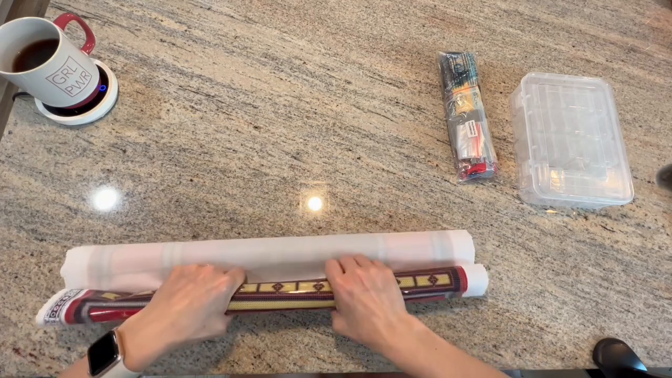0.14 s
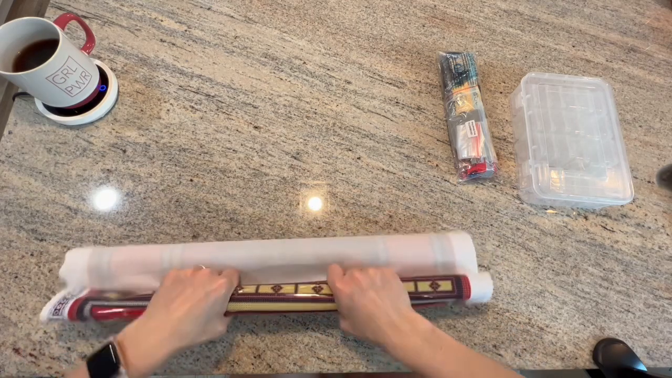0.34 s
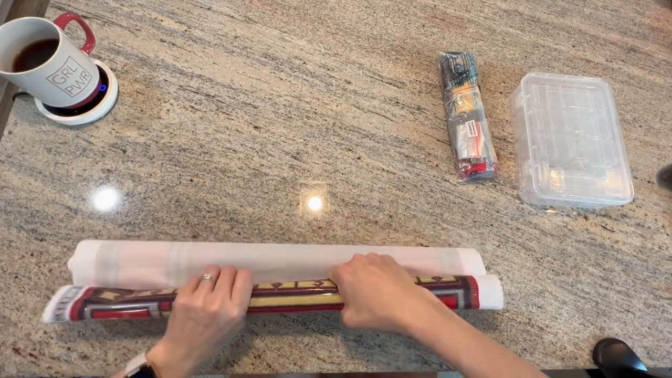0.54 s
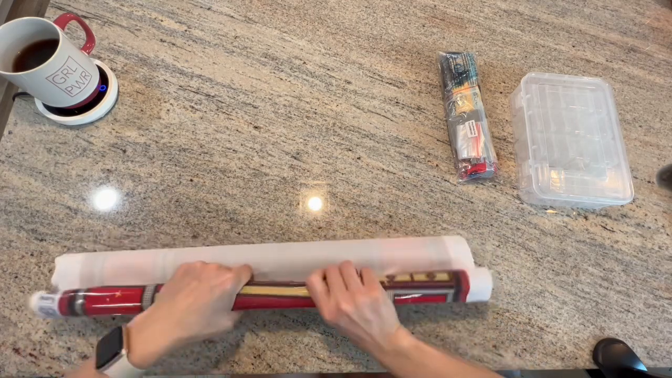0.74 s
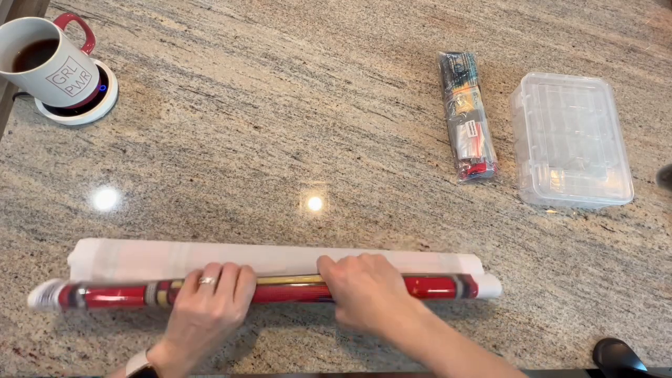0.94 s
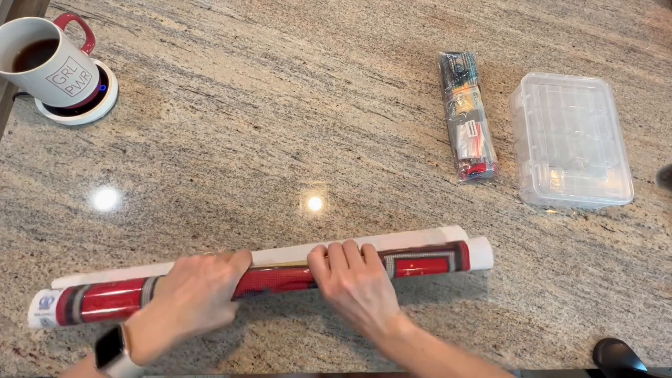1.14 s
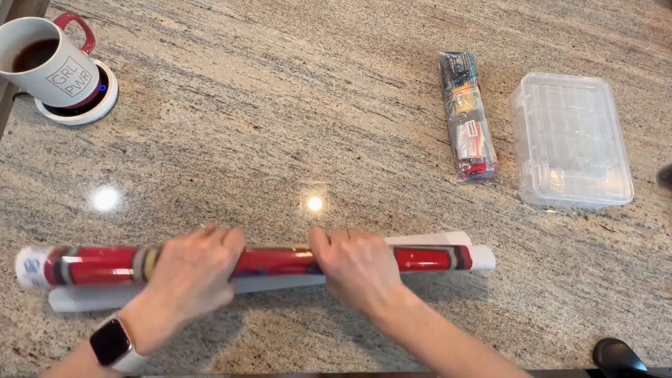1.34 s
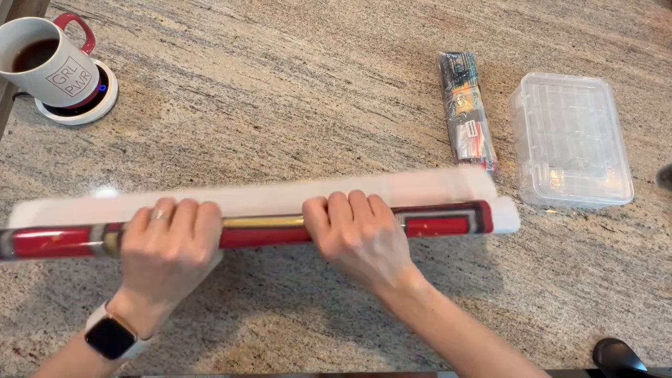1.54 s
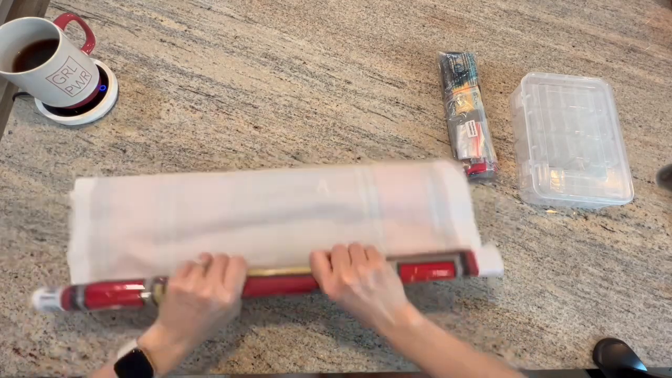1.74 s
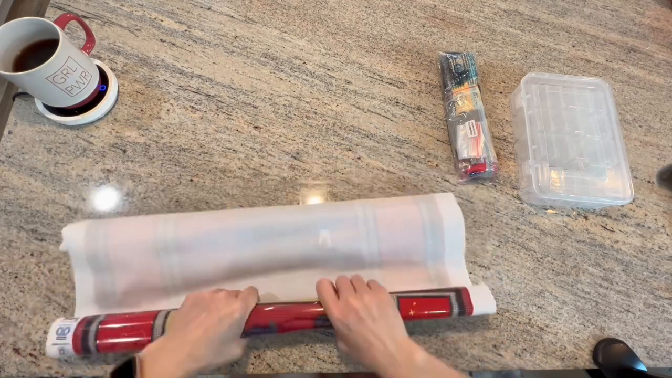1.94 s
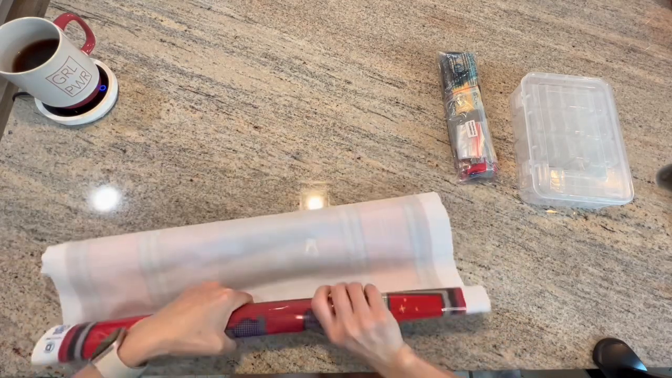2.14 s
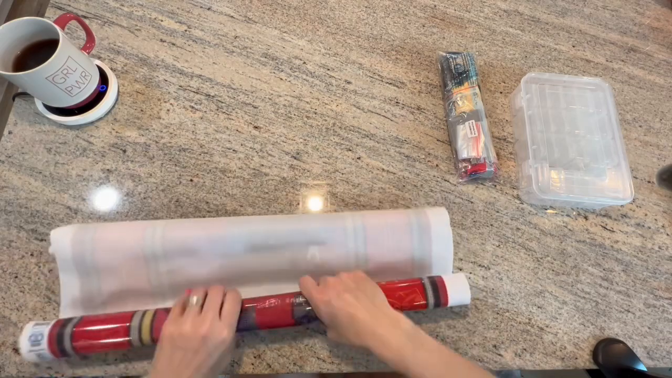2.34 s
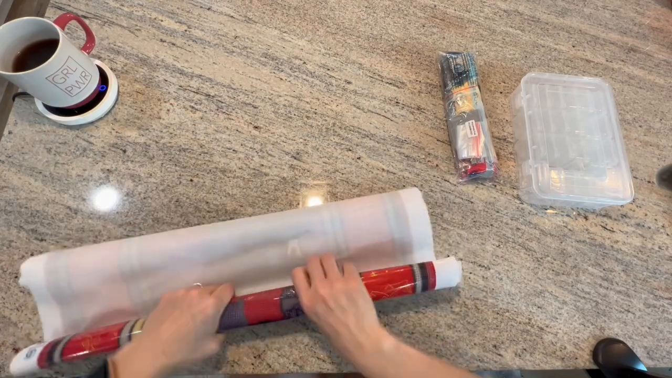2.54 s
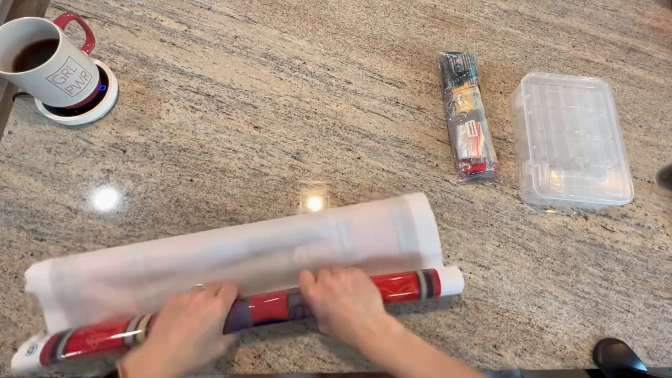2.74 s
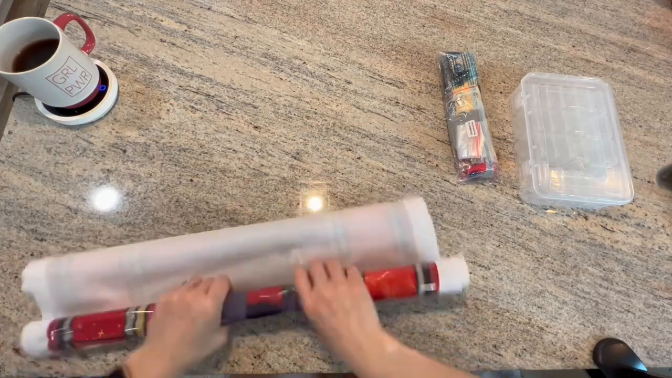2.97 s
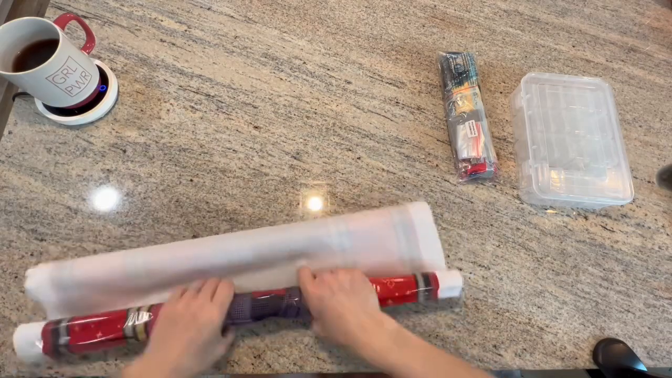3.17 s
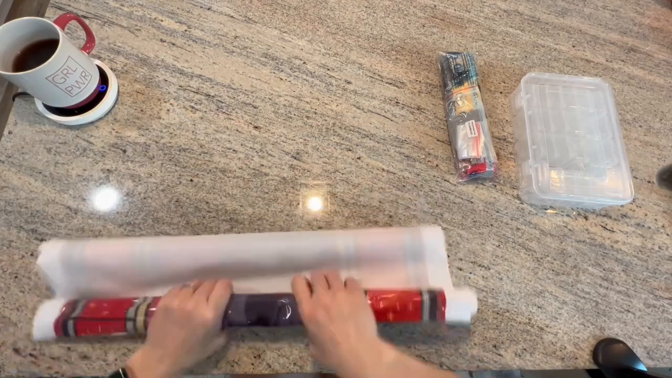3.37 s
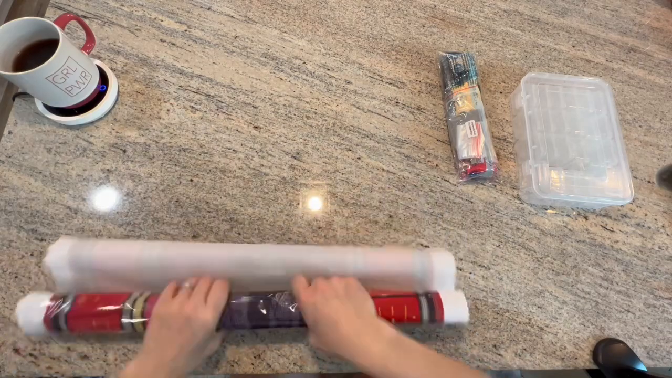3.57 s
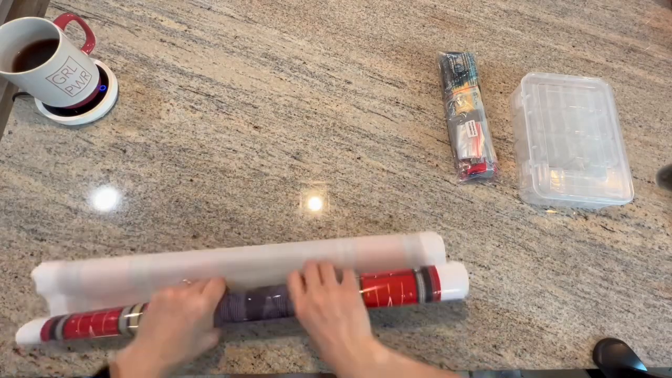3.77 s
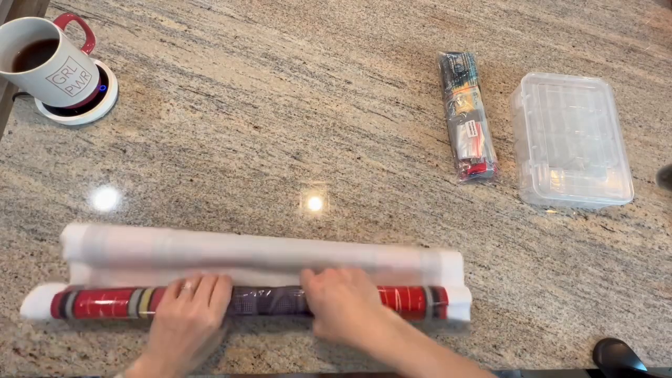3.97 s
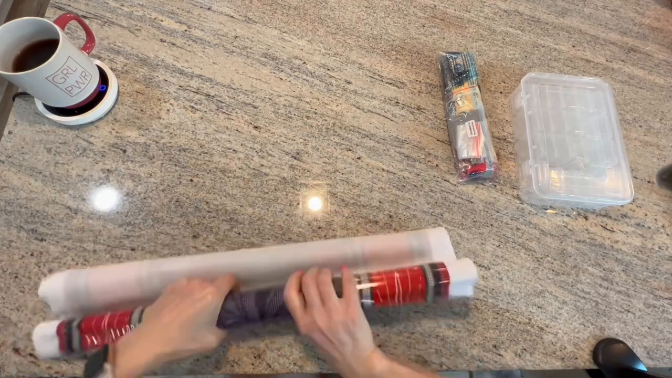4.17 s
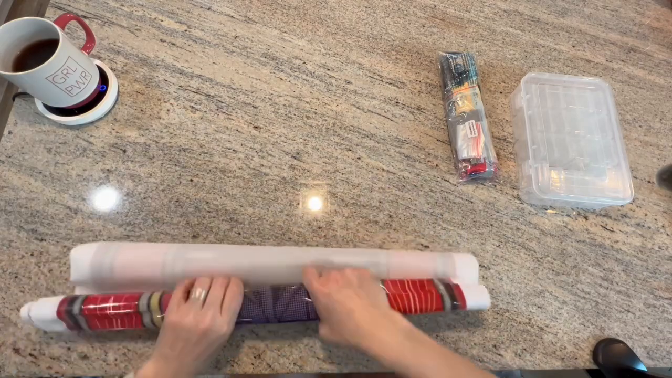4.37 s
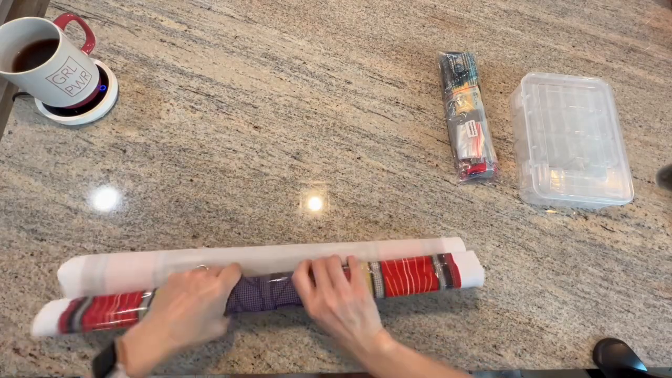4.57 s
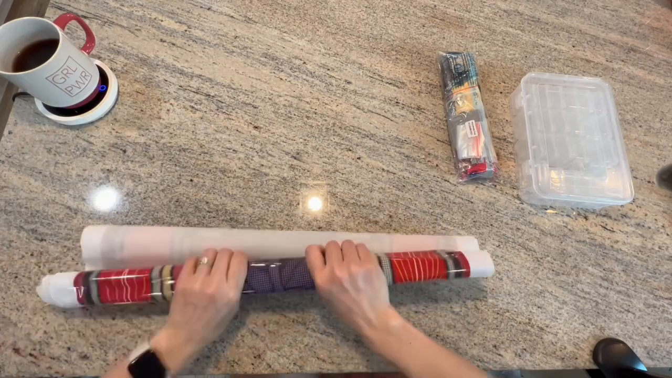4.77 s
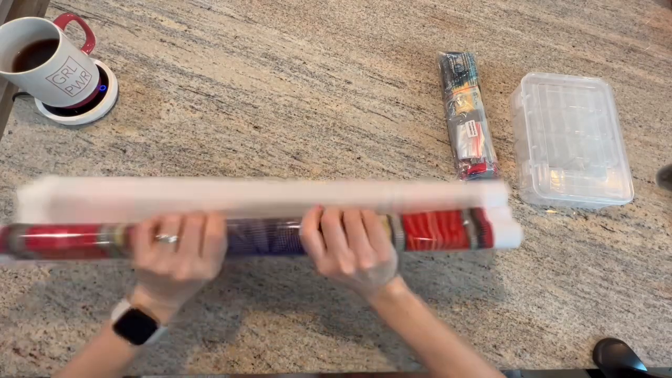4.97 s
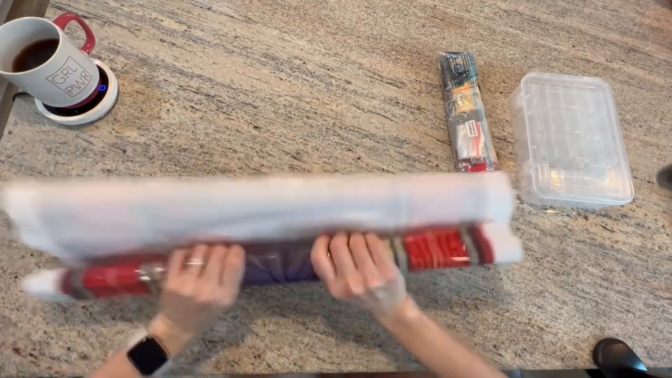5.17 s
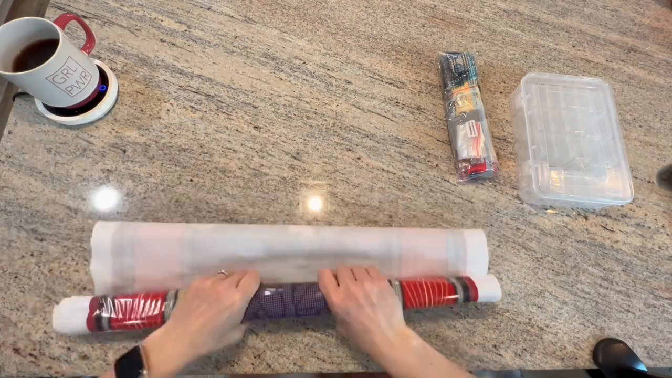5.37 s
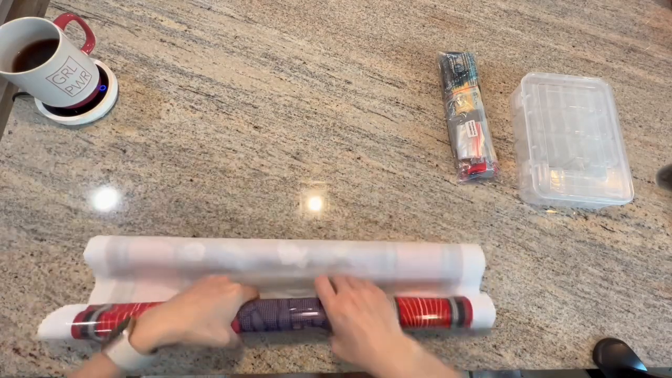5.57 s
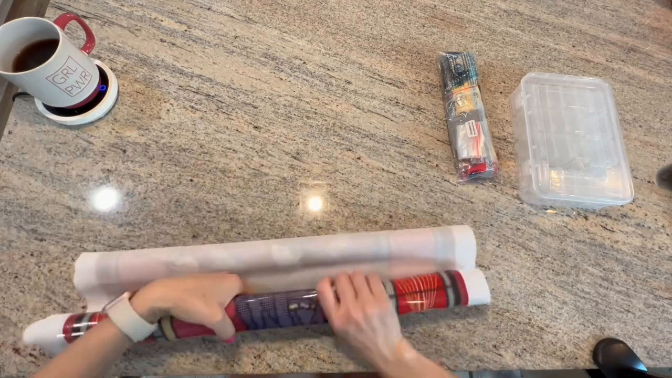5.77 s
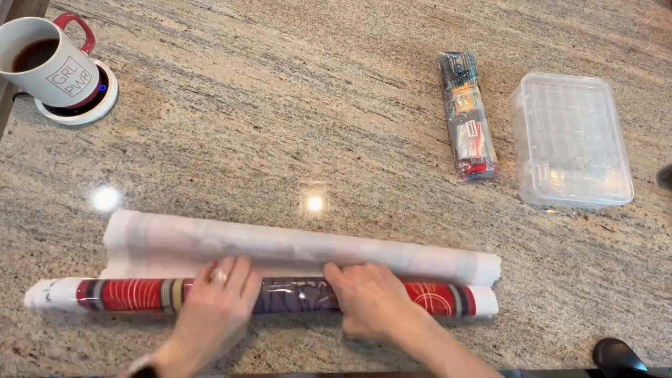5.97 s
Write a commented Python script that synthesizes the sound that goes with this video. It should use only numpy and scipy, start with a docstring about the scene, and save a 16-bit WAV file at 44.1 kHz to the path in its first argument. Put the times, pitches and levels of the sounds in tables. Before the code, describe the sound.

Close up in a quiet room, hands unroll a stiff coated canvas on a stone counter. Busy bright rustling and sharp creases come first, then a softer lull, a cracking slap with hollow pops, steady crinkling and knocking, and a second, heavier slap with a thump before the rustling resumes. Crisp treble leans left in the close stereo pickup.

```python
"""Hiss, dry crackle and small hollow pops: two hands unroll a stiff plastic-coated canvas on a stone counter.
Hand strokes drive noise bursts (coating) and ringing facets (flexing); filtered noise gives edge scrapes,
gliding pulses the buckling pops, low rumble and falling sines the roll bumping along.
Twice the roll slaps down: crack, thump, flap clatter. Sheet sounds also ring the air column in the roll.
A close microphone pair picks this up in a room with quiet air."""
import sys
import numpy as np
from scipy import signal
from scipy.fft import rfft, irfft
from scipy.io import wavfile
from scipy.ndimage import uniform_filter1d, map_coordinates

SR = 44100
rng = np.random.default_rng(int(sys.argv[2]) if len(sys.argv) > 2 else 0)


def store_wav(level_fs):
    """Save 16-bit WAV to argv[1]."""
    pcm = np.round(np.clip(np.atleast_2d(level_fs), -1, 1) * 32767)
    wavfile.write(sys.argv[1], SR, pcm.T.astype(np.int16))


N = 265041
TIME = np.arange(N) / SR
BINS = np.fft.rfftfreq(N, 1 / SR)

SLACKEN_DB_PER_S, RELEASE_S = 18, 0.05  # release: time constant


def stroke(t, swell_s, length_s):
    """Stroke envelope: swells, slackens while the hand moves, then the stiff sheet creeps to rest."""
    held_s = np.clip(t, 0, length_s)
    attack = np.clip(t / swell_s, 0, 1)
    release = np.exp(-np.maximum(t - length_s, 0) / RELEASE_S)
    return attack * gain_of(-SLACKEN_DB_PER_S * held_s) * release


# pushes and pulls of a hand: start t/s, swell/s, length/s, sliding level/dB, flexing level/dB,
# treble side/dB (higher = further left)
HAND_STROKES = [ (-0.02, .01, 0.015, -41, -40.5, 11), (0.069, 0.033, 0.035, -38.5, -34, 12),
                (0.171, 0.039, 0.072, -37.5, -36, 9), (0.24, 0.0083, 0.07, -39.5, -52, 10),
                (0.287, 0.063, 0.095, -39, -39.5, 11.5), (0.462, 0.0077, 0.11, -43, -49, 15),
                (0.52, 0.023, 0.11, -39, -39, 11.5), (0.643, 0.015, 0.021, -37, -47, 10),
                (0.716, 0.0068, 0.016, -38.5, -37.5, 10.5), (0.755, 0.033, 0.1, -39.5, -38.5, 12),
                (0.936, 0.087, 0.16, -37.5, -37.5, 11.5), (1.123, 0.018, 0.093, -40.5, -36.5, 11),
                (1.216, 0.024, 0.25, -50.5, -46.5, 14), (1.468, 0.043, 0.09, -54, -45, 12),
                (1.678, 0.018, 0.056, -42, -51, 10.5), (1.86, 0.042, 0.077, -44, -44, 10.5),
                (2.122, 0.014, 0.053, -43, -36, 7), (2.176, 0.0092, 0.061, -40, -39.5, 10.5),
                (2.307, 0.039, 0.12, -48, -42, 11.5), (2.408, 0.032, 0.1, -44.5, -38, 11),
                (2.551, 0.043, 0.1, -39.5, -36.5, 10), (2.694, 0.022, 0.08, -47, -42, 11),
                (2.798, .015, 0.18, -44.5, -40.5, 11.5), (2.988, 0.0084, 0.016, -41, -38, 13),
                (3.037, 0.02, 0.17, -44.5, -40, 10), (3.238, 0.066, 0.13, -42.5, -36.5, 11.5),
                (3.434, 0.028, 0.16, -44.5, -39.5, 10), (3.597, 0.036, 0.15, -43, -44.5, 12.5),
                (3.786, 0.014, 0.15, -43.5, -43.5, 11.5), (3.92, 0.023, 0.16, -46.5, -41, 8.5),
                (4.05, 0.041, 0.1, -42.5, -43.5, 10), (4.188, 0.095, 0.17, -43, -39, 10.5),
                (4.419, 0.037, 0.08, -46, -42, 11.5), (4.577, 0.014, 0.17, -50.5, -46.5, 11.5),
                (4.778, 0.054, 0.087, -44.5, -41, 13.5), (4.93, 0.018, 0.14, -49.5, -52, 10),
                (5.071, 0.0098, 0.24, -45, -45, 10.5), (5.361, 0.026, 0.075, -43, -40.5, 11.5),
                (5.53, 0.044, 0.035, -42.5, -41, 11), (5.631, 0.014, 0.081, -49.5, -47.5, 8.5),
                (5.761, .008, 0.088, -45.5, -43.5, 8), (5.85, 0.034, 0.084, -44.5, -40.5, 9.5), ]
# the held sheet, never quite still: sliding level/dB, flexing level/dB, treble side/dB
HELD_SHEET = (-57.5, -51.5, 11.5)


def handling():
    """Strokes add in power; returns sliding gain, flexing gain and power-weighted treble side in dB."""
    t = TIME[::32]
    shapes = [stroke(t - start, swell, length) for start, swell, length, *_ in HAND_STROKES]
    power = np.array(shapes + [np.ones(len(t))]) ** 2
    slide_db, flex_db, side_db = np.transpose([row[3:] for row in HAND_STROKES] + [HELD_SHEET])
    slide_power, flex_power = gain_of(slide_db) ** 2, gain_of(flex_db) ** 2
    slide = np.sqrt(slide_power @ power)
    flex = np.sqrt(flex_power @ power)
    side = (side_db * slide_power) @ power / (slide_power @ power)
    return [np.interp(TIME, t, control) for control in (slide, flex, side)]


# spectrum of coating hiss: f/Hz, level/dB
HISS_COLOUR = [(60, -44), (200, -12.5), (500, 0), (900, -5.5), (2500, 1), (3800, -0.5), (6000, 1),
               (8000, -1.5), (10000, -3), (12000, -6.5), (13500, -11.5), (16000, -10.5)]
# spectrum of crackles and crinkles: f/Hz, level/dB
CRACKLE_COLOUR = [(60, -44), (250, -14), (1000, -5.5), (3200, 7.5), (6500, 2), (9000, 2.5), (12000, 6),
                  (16000, -4.5)]


def sliding(slide, hand_db, level_db=3.0, crackle_db=-9, crackles_per_s=80, sway=1.0, centre_db=12.0,
            sparkle=1.0):
    """Coating rubs over coating and stone: dense micro-slips puff hiss, sparser ones crackle dryly."""
    puff_s, crackle_s = 0.0009, 0.00054  # decay time constants
    power = signal.lfilter([1], [1, -np.exp(-1 / (puff_s * SR))], slips(1800, 3., 5) ** 2)
    puffs = np.sqrt(power / power.mean() + .5)
    hiss = evened(puffs * rng.standard_normal((2, N)))
    bursts = signal.lfilter([1], [1, -np.exp(-1 / (crackle_s * SR))], slips(crackles_per_s, 2.8, 3.3))
    crackle = gain_of(crackle_db) * evened(bursts * rng.standard_normal((2, N)))
    speed = gain_of(level_db) * slide
    rub = rfft(colour(hiss * speed, HISS_COLOUR) + colour(crackle * speed, CRACKLE_COLOUR), axis=1)
    # the hands take turns: treble swings between sides, right-hand strokes are brighter
    side_db = sway * (hand_db - centre_db)
    above = np.interp(BINS, [1500, 4500], [0, 1])
    top = np.interp(BINS, [8000, 9500], [0, 1])
    body, treble, fizz = (irfft(rub * band, N, axis=1) for band in (1 - above, above - top, top))
    return body + treble * gain_of(np.outer([.5, -.5], side_db)) + fizz * gain_of(-sparkle * side_db)


# curl of the sheet; tighter = smaller facets, ringing higher: t/s, tilt/(dB per octave)
CURL_TILT = [(.3, 1), (.9, -2.5), (2.2, -3), (4.3, 1.5), (5.1, -3.5), (5.9, 0.5)]


def scratching(slide, level_db=-4, cycles=3, ticks_per_s=24, count=10):
    """The weave catches under the sliding coating in tiny separate ticks, most where the curl is tight."""
    out, t = np.zeros((2, N)), TIME[:SR // 100]
    for hz in np.geomspace(1000, 6000, count):
        phase = rng.random((2, 1))
        tick = strike(t, .3 / hz, cycles / hz) * np.sin(2 * np.pi * (hz * t + phase))
        catches = slips(ticks_per_s, 2.4, 2.1)
        out += np.sqrt(hz) * signal.oaconvolve(catches[None], tick, axes=1)[:, :N]
    curl_db = np.interp(TIME, *np.transpose(CURL_TILT))
    return gain_of(level_db + curl_db) * evened(out) * slide


# spectrum of flipping facets: f/Hz, level/dB
FLEX_COLOUR = [(150, -18), (260, -4), (350, 1.5), (480, 0.5), (680, 1.5), (1100, 5), (1650, 0.5),
               (2500, -2), (4000, -16), (9000, -39)]


def flexing(flex, level_db=-2, cycles=7, count=52, clump_db=9.0, clumps_per_s=24):
    """Small facets flip over, each ringing a few cycles; facets of like size give way in clumps."""
    out, t = np.zeros((2, N)), TIME[:SR // 16]
    tilt_db = np.interp(TIME, *np.transpose(CURL_TILT))
    for group in np.array_split(np.geomspace(250, 3600, count), 6):
        clumps = gain_of(clump_db * np.tanh(drift(clumps_per_s)))
        for hz in group:
            phase = rng.random((2, 1))
            ring = strike(t, 0.0001, cycles / hz) * np.sin(2 * np.pi * (hz * t + phase))
            flips = slips(50 * np.sqrt(hz / 1000), 2.23, 4.1)
            flips = flips * clumps * gain_of(tilt_db * np.log2(hz / 1000))
            out += hz * signal.oaconvolve(flips[None], ring, axes=1)[:, :N]
    return gain_of(level_db) * evened(colour(out, FLEX_COLOUR)) * flex


# sharp creases of the coating: t/s, level/dB, tilt/(dB per octave)
CREASES = [(0.0835, -35.5, -7), (0.1025, -41, -12), (0.229, -20, -3), (0.261, -21.5, 1),
           (0.2818, -19.5, -1.5), (0.3274, -31, -6.5), (0.4867, -28, -4), (0.5172, -27, -2),
           (0.652, -38, -6), (0.7265, -27, 0), (0.9738, -31, -6), (2.13, -34.5, 8), (2.6464, -27.5, 5),
           (2.659, -36, 9), (3.0014, -22, -5), (3.192, -26, -7), (3.5264, -26, 3.5), (3.799, -44, 12),
           (3.9465, -34, 7), (4.146, -31, -1.5), (4.168, -33, 2), (5.044, -34, 0), (5.4285, -22.5, -3),
           (5.9333, -31.5, -1)]


def crinkles(level_db=-4.0, click_db=15, snap_db=2.5, fizz_db=-12, pivot_hz=5000, lag_s=0.00078):
    """A crease gives way with a click and a snap, then sheds a short fizz, all tilted alike."""
    out, t = np.zeros((2, N)), TIME[:SR // 8]
    snap = gain_of(snap_db) * strike(t, 0.00032, 0.006)
    fizz = gain_of(fizz_db) * strike(t, 0.0031, 0.042)
    octaves = np.log2(np.maximum(np.fft.rfftfreq(len(t), 1 / SR), 1000) / pivot_hz)
    click = gain_of(click_db) * signal.unit_impulse(len(t), 30)
    for s, db, tilt_db in CREASES:
        burst = rfft(click + (snap + fizz) * rng.standard_normal((2, len(t))), axis=1)
        tilted = burst * gain_of(db + level_db + tilt_db * octaves)
        add(out, s + lag_s, irfft(tilted, len(t), axis=1))
    return colour(out, CRACKLE_COLOUR)


# dragging curled edges, and the loose flap rattling on after the second slap (about 5.26-5.33 s): start t/s,
# length/s, level/dB, mid-glide f/Hz, glide/octaves
EDGE_DRAGS = [(0.098, 0.013, -47, 990, 0.24), (0.194, .027, -28.5, 2050, 0.19),
              (0.224, 0.04, -29, 1900, 0.43), (0.302, 0.086, -45, 1880, -0.53),
              (0.546, .018, -34, 1100, .2), (0.862, .025, -38, 640, -.3), (1.144, .055, -36, 604, -0.11),
              (1.698, .024, -32.5, 650, 0), (2.168, 0.058, -34, 784, 0.6), (3.33, 0.046, -45, 1350, 0.94),
              (3.485, 0.054, -38, 900, -0.4), (3.714, 0.055, -36.5, 1470, -0.47),
              (3.893, 0.036, -34, 1290, 0.17), (4.825, 0.031, -33.5, 550, 1),
              (5.1, 0.058, -36.5, 500, -0.078), (5.257, 0.073, -31, 920, 0.43),
              (5.562, 0.041, -35.5, 1330, -0.26), (5.888, 0.025, -34, 1420, 0.5)]


def scrapes(level_db=-2.0, width=0.61, slips_per_s=260, swell=2.05, rough=10.0):
    """A curled edge, or the loose flap after the second slap, sticks and slips unevenly through a broad
    resonance that moves as the curl changes."""
    out = np.zeros((2, N))
    for s, length, db, hz, glide in EDGE_DRAGS:
        u = TIME[:round(length * SR)] / length
        pace, noise = np.split(rng.standard_normal((3, SR // 8))[:, :len(u)], [1])
        rate_hz = slips_per_s * np.exp(.5 * evened(uniform_filter1d(pace, 130)))
        turns = np.cumsum(rate_hz) / SR
        pitch_hz = hz * 2 ** (glide * (u - .5))
        rattle = noise * np.exp(-rough * (turns % 1))
        for _ in range(2):
            rattle = resonate(rattle, pitch_hz, width * hz)
        envelope = np.sqrt(abs(np.sin(np.pi * u ** swell)))
        add(out, s, gain_of(db + level_db) * evened(rattle) * envelope)
    return out


# GLIDE: fractional pitch fall from centre to nominal end; right port hears pops later and softer
POP_LEAD_S, POP_GLIDE, POP_LAG_S, POP_RIGHT_DB = 0.02, 0.21, 0.00015, -6.5


def pop(hz, cycles):
    """Dry pulse of a facet flipping over, falling in pitch, centred POP_LEAD_S after its start."""
    t = TIME[:round(2 * POP_LEAD_S * SR)] - POP_LEAD_S - np.array([[0], [POP_LAG_S]])
    u = t * hz / cycles
    pulse = np.exp(-(2 * u) ** 2) * np.sin(-2 * np.pi * cycles * (u - POP_GLIDE * u ** 2))
    return gain_of([[0], [POP_RIGHT_DB]]) * pulse


# large facets popping through, and a few taps of the loose flap after the second slap (about 5.26-5.32 s):
# centre t/s, level/dB, f/Hz, length/cycles
LARGE_POPS = [(0.233, -25, 764, 1.6), (0.4602, -24.5, 885, 1.4), (0.876, -23.5, 500, 2.6),
              (1.7055, -21, 600, 2), (1.762, -12, 450, 1.5), (1.767, -14, 1150, 1.5),
              (1.8015, -21, 764, 5.2), (2.749, -26.5, 1480, 3.5), (3.008, -29, 890, 3.6),
              (3.193, -21.5, 1300, 7.8), (3.382, -26.5, 1550, 7), (3.7537, -18, 1160, 0.82),
              (3.7603, -24, 1110, 0.77), (3.93, -24.5, 1070, 2.4), (3.9743, -20, 1190, 1.3),
              (4.1263, -17.5, 1480, 3.9), (4.133, -21, 1450, 4), (4.349, -12.5, 1170, 1.44),
              (4.3555, -18, 1160, 2.6), (4.494, -28, 1140, 2.6), (4.5021, -26, 1140, 4.4),
              (4.852, -24, 950, 2.9), (5.235, -18.5, 1100, 7.3), (5.256, -20, 970, 7.1),
              (5.29, -20, 387, 3), (5.319, -33, 1160, 7), (5.431, -22.5, 1210, 4.8),
              (5.594, -27, 1110, 4.9), (5.5968, -22.5, 1030, 2.5), (5.659, -29, 980, 2),
              (5.9352, -19, 1380, 1.8)]


def buckles(flex, level_db=0, small_db=7, spread_db=0.5, low_hz=400, high_hz=2000, small_cycles=1.64,
            count=260):
    """Large facets, and the flap tapping after the second slap, pop at listed moments; smaller facets at
    random, as hard as the sheet is flexed."""
    out = np.zeros((2, N))
    for s, db, hz, cycles in LARGE_POPS:
        add(out, s - POP_LEAD_S, gain_of(db + level_db) * pop(hz, cycles))
    for when, size, strength in rng.random((count, 3)):
        at = int(when * N)
        db = small_db - spread_db * np.log(strength + .05)
        hz = low_hz * (high_hz / low_hz) ** size
        add(out, at / SR, flex[at] * gain_of(db) * pop(hz, small_cycles))
    return out


# roll slapping down and settling: t/s, crack level/dB, thump level/dB, settled thump f/Hz, thump t60/s,
# boom level/dB, flap clatter level/dB, fizz level/dB
ROLL_SLAPS = [(1.7384, -15.5, -14, 384, 0.012, -50, -17.5, -35.5),
              (1.7458, -28, -14.5, 273, 0.035, -48, -32, -44),
              (5.2241, -34, -24, 478, 0.072, -57, -28.5, -58),
              (5.2333, -15, -1.5, 343, 0.023, -20, -21.5, -37.5),
              (5.311, -46, -26, 358, 0.052, -52, -31, -61)]
# spectrum of the slap crack: f/Hz, level/dB
SMACK_COLOUR = [(60, -14), (250, -10), (1000, -1), (1600, 0.5), (3000, 6), (4500, 2.5), (6500, 0.5),
                (12000, -0.5), (16000, -21)]
# spectrum of the flap clatter: f/Hz, level/dB
CLATTER_COLOUR = [(30, -21), (60, 2.5), (125, -15.5), (240, 6.5), (700, 3.5), (1150, 2.5), (1650, -8.5),
                  (3500, -9.5), (7000, -9.5), (16000, -14)]
FLUTTER_DB, FLUTTERS_PER_S = 5, 130


def slaps(thump_delay_s=0.0027, sag=0.32, sag_s=0.001, boom_t60_s=0.078):
    """Coating cracks on stone, loose flap flutters and fizzes; squashed roll thumps and booms (returned second)."""
    crack, body, clatter, fizz = np.zeros((4, 2, N))
    t = TIME[:SR * 3 // 5]
    for s, crack_db, thump_db, hz, t60, boom_db, clatter_db, fizz_db in ROLL_SLAPS:
        a, b, c = rng.standard_normal((3, 2, len(t)))
        add(crack, s, gain_of(crack_db) * strike(t, 0.0012, 0.016) * a)
        turns = np.cumsum(hz * (1 + sag * np.exp(-t / sag_s))) / SR  # stiffest while squashed
        thump = gain_of(thump_db) * strike(t, 0.0015, t60)
        boom = gain_of(boom_db) * strike(t, 0.013, boom_t60_s)
        add(body, s + thump_delay_s, (thump + boom) * np.sin(-2 * np.pi * turns))
        add(clatter, s, gain_of(clatter_db) * strike(t, .002, .17) * b)
        add(fizz, s, gain_of(fizz_db) * strike(t, 0.0087, 0.65) * c)
    flutter = evened(gain_of(FLUTTER_DB * np.tanh(drift(FLUTTERS_PER_S))))
    flap = colour(clatter * flutter, CLATTER_COLOUR)
    return colour(crack, SMACK_COLOUR) + flap + colour(fizz, HISS_COLOUR), body


# roll bumping on the counter: start t/s, thud level/dB, hollow knock level/dB
ROLL_BUMPS = [(1.144, -57, -40), (1.751, -32, -38), (2.44, -37, -40), (2.68, -59, -42.5), (2.823, -61, -36),
              (2.855, -45, -38), (3.006, -43, -38.5), (3.1, -58, -37.5), (3.192, -33, -36.5),
              (3.352, -57, -38.5), (3.459, -33.5, -58), (3.485, -50, -34), (3.567, -38, -44),
              (3.678, -60, -36.5), (3.97, -40, -45), (4.349, -39, -41), (5.426, -43, -32.5),
              (5.598, -43, -45), (5.655, -39.5, -52), (5.793, -62, -33), (5.934, -39, -34)]
# weight of the hands on the roll, least while it is lifted: t/s, level/dB
HAND_WEIGHT = [(0, -60.5), (1.15, -55.5), (1.55, -64), (2.3, -57), (3.3, -56.5), (4.35, -51), (4.95, -60),
               (5.2, -50), (6, -52.5)]
# spectrum of the rumble: f/Hz, level/dB
RUMBLE_COLOUR = [(20, -17), (40, -1), (60, 3.5), (110, 2), (180, 2.5), (330, 5), (480, -11), (800, -21),
                 (3000, -58)]
THUD_T60_S, KNOCK_T60_S, JUDDER = 0.045, 0.027, 0.45  # judder: rms of log pitch


def rolling(flex, level_db=1.0, follow=0.6, bump_db=-1, knock_db=0, thud_hz=68, knock_hz=270, fall=2.29,
            fall_s=0.00383):
    """The pressed roll rumbles with each stroke and bumps with a thud and a dull, juddering knock."""
    weight = gain_of(level_db + np.interp(TIME, *np.transpose(HAND_WEIGHT)))
    rumble = weight * evened(flex) ** follow * rng.standard_normal((2, N))
    bumps, t = np.zeros((2, N)), TIME[:SR // 5]
    bend = 1 + fall * np.exp(-t / fall_s)  # short bending waves run ahead of long ones: pitch falls
    for s, thud_db, hollow_db in ROLL_BUMPS:
        judder = np.exp(JUDDER * evened(uniform_filter1d(rng.standard_normal(len(t)), size=90)))
        angle = 2 * np.pi * np.cumsum(bend * judder) / SR
        thud = strike(t, 0.0069, THUD_T60_S) * np.sin(thud_hz * angle)
        knock = strike(t, 0.009, KNOCK_T60_S) * np.sin(knock_hz * angle)
        add(bumps, s, gain_of(thud_db + bump_db) * thud)
        add(bumps, s, gain_of(hollow_db + knock_db) * knock)
    return colour(rumble, RUMBLE_COLOUR) + bumps


# resonances of the air column in the roll: f/Hz, level/dB, t60/s
AIR_COLUMN = [(137.8, -9.5, 0.33), (350, -4, 0.19), (493, -5.5, 0.09), (702, -3.5, 0.38), (884, -1.5, 0.15),
              (1072.6, 3, 0.1), (1213, 6, 0.025), (1423, -6, 0.43), (1572, 3.5, 0.085), (1704, -1, 0.22)]
WAVER, SQUEEZES_PER_S = 0.00911, 6  # waver: approximate fractional pitch wander


def hollow(x, level_db=-14.0):
    """Sheet sounds stir the air column in the roll; its pitch wavers as the hands squeeze it."""
    t = TIME[:SR // 3]
    ring = sum(gain_of(db) * np.exp(-np.log(1000) * t / t60) * np.cos(2 * np.pi * hz * t)
               for hz, db, t60 in AIR_COLUMN)
    ring = ring / np.linalg.norm(ring)
    rung = gain_of(level_db) * signal.oaconvolve(x, ring[None], axes=1)[:, :N]
    squeezed = TIME + WAVER / SQUEEZES_PER_S * drift(SQUEEZES_PER_S)
    return np.array([np.interp(squeezed, TIME, side) for side in rung])


# reverberation: f/Hz, t60/s
ROOM_DECAY = [(100, 0.8), (400, 0.58), (1500, 1), (6000, 0.39), (16000, 0.54)]


def room(x, level_db=-10):
    """Sparse random reflections after 5 ms, each band dying at its own speed."""
    length = SR // 2
    signs = rng.choice([-1., 1.], (2, length))
    taps = signs * (rng.random((2, length)) < 2500 / SR) * (TIME[:length] > .005)
    hz, t, z = signal.stft(taps, SR, nperseg=256)
    z = z * np.exp(-np.log(1000) * t / read(ROOM_DECAY, hz)[:, None])
    tail = signal.istft(z, SR, nperseg=256)[1]
    return gain_of(level_db) * signal.oaconvolve(x, tail / np.linalg.norm(tail[0]), axes=1)[:, :N]


# spectrum of the quiet air: f/Hz, level/dB
AIR_COLOUR = [(20, -8), (70, 4), (200, -0.5), (500, 1), (1000, -5.5), (4000, -7), (16000, -17)]


def quiet_air(level_db=-56.5):
    """Steady background air: coloured noise."""
    return gain_of(level_db) * colour(rng.standard_normal((2, N)), AIR_COLOUR)


# likeness of the two ports: f/Hz, likeness/(0-1)
PORT_LIKENESS = [(50, 0.88), (350, 0.89), (650, 0.31), (1100, 0.12), (3000, 0.12), (8500, 0.03),
                 (10200, 0.92), (11000, 0.85), (12000, 1), (13000, 0.98), (13900, 0.77), (15600, .95)]
# level difference: f/Hz, left minus right level/dB
PORT_BALANCE = [(100, 1), (500, 1), (1300, 3), (2200, 1), (4000, 4.5), (5600, 8.5), (7500, 8.5), (9000, 0),
                (16000, -0.5)]
# phase lead of the right port: f/Hz, lead/turns
PORT_LEAD = [(100, 0), (800, -.12), (4500, -.05), (8500, 0), (9700, .47), (10600, .53), (11600, .98),
             (12600, 1.03), (13500, 1.48), (14300, 1.54), (15200, 2)]


def ports(x):
    """Microphone pair: alike in the bass, swinging in and out of phase in the top treble."""
    left, other = rfft(x, axis=1)
    same = np.clip(read(PORT_LIKENESS, BINS), 0, 1)
    right = same * left + np.sqrt(1 - same ** 2) * other
    right = right * np.exp(2j * np.pi * read(PORT_LEAD, BINS))
    tilt = gain_of(read(PORT_BALANCE, BINS) / 2)
    return irfft(np.array([left * tilt, right / tilt]), N, axis=1)


def gain_of(db):
    """Decibels to amplitude."""
    return 10 ** (np.asarray(db) / 20)


def evened(x):
    """Scales to rms 1."""
    return x / np.sqrt(np.mean(x ** 2) + 1e-20)


def read(points, hz):
    """Interpolates a table along log frequency."""
    f, value = np.transpose(points)
    return np.interp(np.log(hz + 1), np.log(f + 1), value)


def add(mix, s, sound):
    """Mixes a sound in at time s."""
    part = mix[:, max(round(s * SR), 0):][:, :sound.shape[-1]]
    part += sound[..., :part.shape[-1]]


def colour(x, points):
    """Causal minimum-phase filter with the given spectrum; white noise keeps its power."""
    gain = evened(gain_of(read(points, abs(np.fft.fftfreq(4096, 1 / SR)))))
    taps = np.fft.ifft(np.exp(np.conj(signal.hilbert(np.log(gain))))).real
    return signal.oaconvolve(x, taps[None, :len(taps) // 2], axes=1)[:, :N]


def strike(t, rise_s, t60_s):
    """Envelope of peak 1: swells over about rise_s, dies away 60 dB per t60_s."""
    shape = (1 - np.exp(-(t / rise_s) ** 2)) * np.exp(-np.log(1000) * t / t60_s)
    return shape / shape.max()


def slips(per_s, spread_db, size_limit):
    """Random train of tiny stick-slip releases, most weak and a few strong."""
    size = np.minimum(rng.exponential(1, N), size_limit)
    return (rng.random(N) < per_s / SR) * gain_of(spread_db * size)


def drift(per_s):
    """Smooth random curve of rms 1 with per_s new knots a second."""
    knots = rng.standard_normal(2048)
    return evened(map_coordinates(knots, [TIME * per_s], order=2, mode="wrap"))


def resonate(x, hz, width_hz):
    """Resonance following the pitch curve hz: shift down, one-pole lowpass, shift back."""
    turn = np.exp(2j * np.pi * np.cumsum(hz) / SR)
    r = np.exp(-np.pi * width_hz / SR)
    return 2 * (turn * signal.lfilter([1 - r], [1, -r], x / turn)).real


def scene():
    """All canvas sounds, the room and its quiet air."""
    smack, thump = slaps()
    slide, flex, hand_db = handling()
    sheet = sliding(slide, hand_db) + scratching(slide) + flexing(flex)
    sheet = sheet + rolling(flex) + scrapes() + crinkles() + smack
    # close sounds bypass the port differences and go softer into the room
    close = thump + buckles(flex)
    into_room = sheet + gain_of(-5) * close
    return ports(sheet + hollow(sheet) + room(into_room) + quiet_air()) + close


EDGE_HZ = 15900


def record(dry, low_cut_hz=45):
    """Microphone bass roll-off and recorder band limit."""
    thinned = signal.sosfilt(signal.butter(2, low_cut_hz, "highpass", fs=SR, output="sos"), dry)
    band_limit = signal.firwin(511, EDGE_HZ, window=("kaiser", 9), fs=SR)
    return signal.oaconvolve(thinned, band_limit[None], "same")


dry = scene()
out = record(dry)
store_wav(out)
```